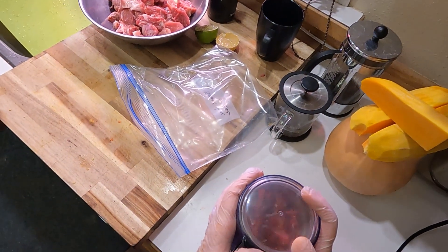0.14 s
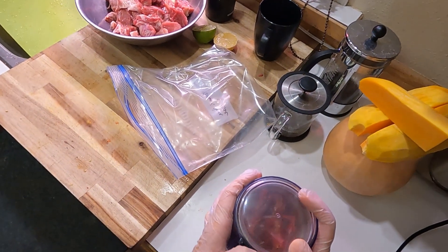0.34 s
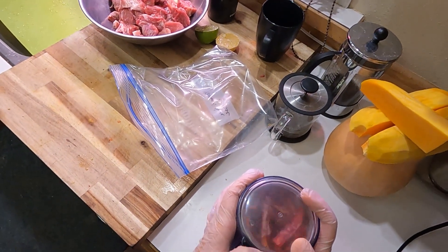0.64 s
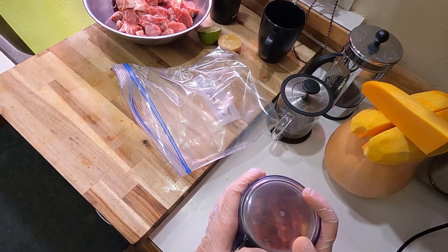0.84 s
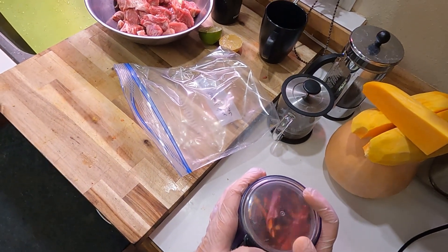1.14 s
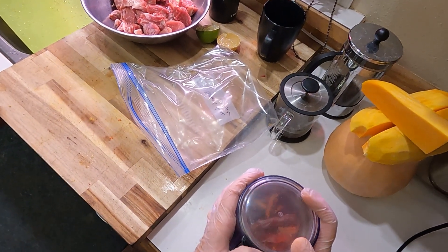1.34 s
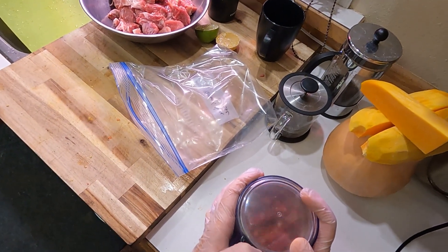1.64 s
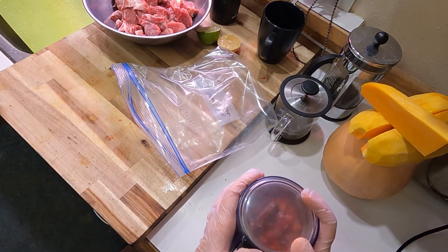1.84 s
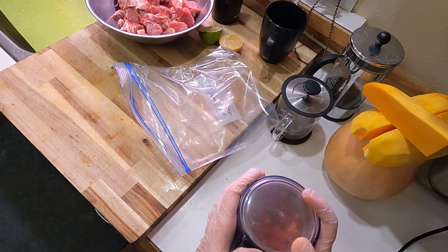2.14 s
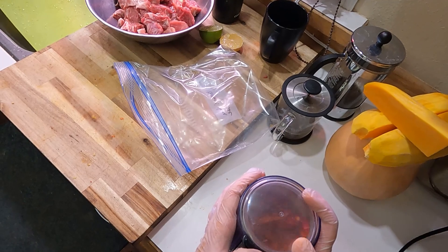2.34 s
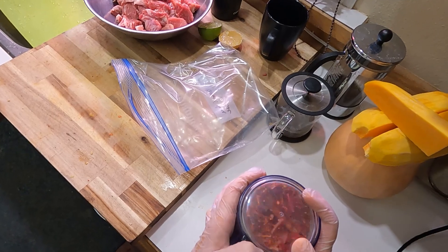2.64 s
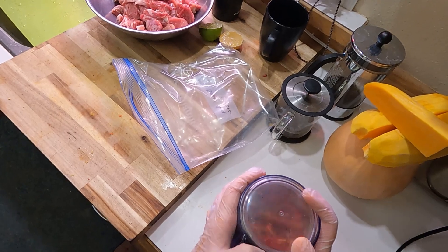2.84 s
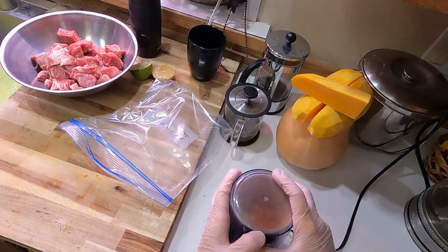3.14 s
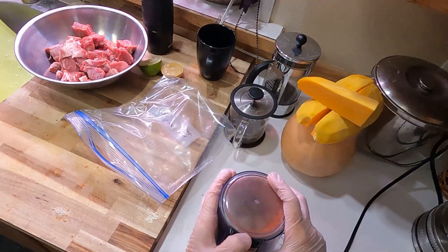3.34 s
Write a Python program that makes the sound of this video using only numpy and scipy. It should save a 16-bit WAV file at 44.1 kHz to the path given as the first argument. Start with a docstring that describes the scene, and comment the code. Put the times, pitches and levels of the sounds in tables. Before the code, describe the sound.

Electric blade grinder pulsed repeatedly, dried chilies crackling inside as the motor winds down.

```python
"""A small electric blade grinder chops dried chilies in pulses on a kitchen counter, over a faint room hum.
One burst is already dying away; presses follow at 0.5, 1.6 and 2.7 s. At each the motor whirs up and
coasts down, pods knock in the ringing cup and flakes hiss along the lid until they settle.
At 3.2 s the fourth burst breaks off abruptly. The lid ticks under the fingers; a softer burst follows."""
import sys
import numpy as np
from scipy import signal
from scipy.fft import rfft, irfft
from scipy.io import wavfile
from scipy.ndimage import map_coordinates

SR = 44100
rng = np.random.default_rng(int(sys.argv[2]) if len(sys.argv) > 2 else 0)


def pcm_store(signal):
    """Save signal as 16-bit PCM."""
    levels = np.round(np.clip(np.atleast_2d(signal), -1, 1) * 32767)
    wavfile.write(sys.argv[1], SR, levels.astype(np.int16).T)


N = 154350
TOP_SPEED_HZ = 301.7

# Dry crack of a pod. Each row: frequency in Hz, relative level in dB.
CRACK_SPECTRUM = [(60, -1), (170, -18), (450, -15), (760, -13.5), (950, -4.5), (1150, -6), (1900, 3.5),
                  (3200, -9.5), (5200, -13), (7200, -7), (8500, -30.5), (12000, -33.5), (14500, -51)]


def undb(db):
    return 10 ** (np.asarray(db) / 20)


def unit(x):
    """Scale to rms 1."""
    return x / np.sqrt(np.mean(x ** 2))


def butter(x, order, hz, kind):
    return signal.sosfilt(signal.butter(order, hz, kind, fs=SR, output="sos"), x)


def colour(x, points):
    """Minimum-phase filter through (Hz, dB) points."""
    hz, db = np.array(points).T
    size = 2048
    bin_hz = np.arange(size // 2 + 1) * SR / size
    gain = undb(np.interp(np.log(bin_hz + 1), np.log(hz), db))
    cepstrum = irfft(np.log(gain))
    cepstrum[1:size // 2] *= 2
    cepstrum[size // 2 + 1:] = 0
    return signal.fftconvolve(x, irfft(np.exp(rfft(cepstrum))))[:len(x)]


def resonate(x, hz, width_hz):
    """One resonance, gain 1 at its centre."""
    return signal.lfilter(*signal.iirpeak(hz, hz / width_hz, fs=SR), x)


def wander(rate_hz):
    """Slow random drift, rms 1."""
    return unit(np.interp(np.arange(N) * rate_hz / SR, np.arange(2048), rng.standard_normal(2048)))


def impacts(per_s, spread_db):
    """Random clicks, a few stronger than the rest."""
    hit = rng.random(N) < per_s / SR
    size = undb(spread_db * np.minimum(rng.exponential(size=N), 4))
    return unit(hit * size * np.sign(rng.standard_normal(N)))


def fade(t, start_s, decay_s):
    """Sudden start, exponential decay."""
    return (t >= start_s) * np.exp(-np.maximum(t - start_s, 0) / decay_s)


def echoes(t, x, decay_s):
    """Convolve with a dense decaying tail of unit energy."""
    tail = (rng.standard_normal(N) * np.exp(-t / decay_s))[:SR // 3]
    return signal.fftconvolve(x, tail / np.linalg.norm(tail))[:N]


def kitchen_hum():
    """Low steady room noise, mostly alike on both sides."""
    # Each row: frequency in Hz, relative level in dB.
    spectrum = [(30, -29), (90, -22), (150, -11.5), (250, -12.5), (340, 2.5), (450, -14), (600, -7.5),
                (900, -17), (1750, -13), (3000, -23.5), (4600, -25), (8000, -44), (14000, -57)]
    mid, side = (unit(colour(rng.standard_normal(N), spectrum)) for _ in range(2))
    return undb(-59) * (mid + undb(-9.5) * np.array([side, -side]))


def reflections(t, x):
    """Counter-top reflections set the two sides apart; the kitchen adds a short echo."""
    # Each row: frequency in Hz, level against the direct sound in dB.
    counter_spectrum = [(100, -25), (280, -30.5), (500, -22), (1000, -16.5), (2000, -12), (4000, -9),
                        (8000, -8), (12000, -8)]
    left_lag_s = 12e-6
    side = colour(echoes(t, x, decay_s=.0042), counter_spectrum)
    left = map_coordinates(x + side, [(t - left_lag_s) * SR], mode="nearest")
    sent = butter(x, 2, 500, "high")
    room = np.array([echoes(t, sent, decay_s=.054) for _ in range(2)])
    return np.array([left, x - side]) + undb(-12) * room


def lid_ticks(t):
    """The plastic lid ticks faintly under the fingers between bursts."""
    # Each row: start in seconds, centre in Hz, width in Hz, level in dB, decay in seconds.
    ticks = [(2.542, 6030, 2030, -46, 0.002), (3.227, 6200, 404.8, -63, 0.0066),
             (3.229, 4200, 400, -56, 0.0077), (3.24, 1570, 1090, -47, 0.0083),
             (3.295, 6460, 3500, -54, 0.00062), (3.342, 4400, 2962, -48.5, .012)]
    sound = np.zeros(N)
    for start_s, hz, width_hz, db, decay_s in ticks:
        band = resonate(rng.standard_normal(N), hz, width_hz)
        sound += undb(db) * fade(t, start_s, decay_s) * unit(resonate(band, hz, width_hz))
    return sound


def presses(t):
    """Each press spins the shaft up and throws the load about; friction then slows the shaft."""
    # Each row: start in seconds, powered time in seconds, attack in seconds, end in seconds,
    # level in dB, extra flake level in dB, stretch factor on the time aloft.
    bursts = [(-.6, .3, .003, 0.58, -0.54, 0, 0.97), (.477, .305, 0.0073, 1.8, .5, 0, 0.98),
              (1.58, .305, 0.0036, 2.422, 0.37, -0.5, 1), (2.692, .305, 0.0029, 3.2, 1, -0.5, 1.03),
              (3.349, .3, 0.0056, 3.718, -3, -3.5, 0.57)]
    # Each row: time since the press in seconds before stretching, pod level in dB, flake level in dB.
    tumble = [(0, -3, -3), (.05, -3.5, -3), (.15, -2, 0), (.28, -3, 0), (.38, -1.5, -2.5), (.47, -.5, -3),
              (.53, -4.5, -7), (.62, -1.5, -6), (.73, -4.5, -9), (.81, -11, -17), (.9, -21, -27),
              (1.0, -29, -42), (1.15, -44, -60)]
    spin_up_s, coast_s, friction_hz = .072, .38, 28.04
    speed_hz, motor_gain, pod_gain, flake_gain = np.zeros((4, N))
    tumble_s, pod_db, flake_db = np.array(tumble).T
    for start_s, held_s, attack_s, end_s, db, extra_db, stretch in bursts:
        age_s = np.maximum(t - start_s, 0)
        powered_hz = TOP_SPEED_HZ * (1 - np.exp(-np.minimum(age_s, held_s) / spin_up_s))
        coast = np.exp(-np.maximum(age_s - held_s, 0) / coast_s)
        burst_hz = np.maximum((powered_hz + friction_hz) * coast - friction_hz, 0)
        speed_hz = np.where(t >= start_s, burst_hz, speed_hz)
        gain = undb(db) * np.clip(age_s / attack_s, 0, 1) * (t < end_s)
        motor_gain += gain
        pod_gain += gain * undb(np.interp(age_s / stretch, tumble_s, pod_db))
        flake_gain += gain * undb(extra_db + np.interp(age_s / stretch, tumble_s, flake_db))
    return speed_hz, motor_gain, pod_gain, flake_gain


def motor_whir(speed_hz, angle_rad):
    """The unbalanced shaft and its overtones, louder with speed and shaken by the load."""
    # Each row: multiple of the shaft speed, rms level at top speed in dB, exponent of level against speed.
    tones = [(1, -33.5, 2.9), (2, -48, 1.3), (7, -41.5, 1.55), (8, -34, 10)]
    sound = np.zeros(N)
    for multiple, db, exponent in tones:
        amplitude = np.sqrt(2) * undb(db) * (speed_hz / TOP_SPEED_HZ) ** exponent
        shake = 1 + .36 * wander(rate_hz=70)
        sound += amplitude * shake * np.sin(multiple * angle_rad)
    return sound


def lid_ring(t, x):
    """The plastic lid smears the treble with many short, close resonances; rms 1."""
    treble = butter(x, 2, 3530, "high")
    return unit(x + undb(-4.5) * echoes(t, treble, decay_s=.012))


def cup_ring(blows):
    """Cup and lid ring when struck."""
    # Each row: frequency in Hz, width in Hz, gain in dB.
    modes = [(181, 27.5, -7.5), (358.5, 22, -8), (560, 96, -8.5), (930, 23, 4.5), (976, 42, -3.5),
             (1266, 27, -1.5), (1499, 35, -4), (1706, 36, 0.5), (1854, 40, 7), (2045, 40, 2),
             (2375, 32, -11.5), (2975, 50, -7), (3535, 30, -8.5), (4047, 80, -9), (4500, 120, -13.5),
             (5087, 105, -9), (6240, 70, -15), (6860, 134, -12.5)]
    ring = sum(undb(db) * resonate(blows, hz, width_hz) for hz, width_hz, db in modes)
    return butter(ring, 6, 7950, "low")


def pod_knocks(t):
    """A large pod caught by the blade crunches for a few milliseconds; the cup rings on."""
    # Each row: start in seconds, level in dB.
    knocks = [(0.486, -25), (0.683, -30), (1.248, -21.5), (1.306, -30.5), (1.581, -27.5), (1.965, -22),
              (2.06, -27), (2.352, -31), (2.693, -24), (3.354, -26.5), (0.122, -28)]
    grit = rng.standard_normal(N)
    crunch = grit * sum(undb(db) * fade(t, start_s, decay_s=.0053) for start_s, db in knocks)
    ring = cup_ring(crunch) / np.std(cup_ring(grit))
    crack = colour(crunch, CRACK_SPECTRUM) / np.std(colour(grit, CRACK_SPECTRUM))
    return ring + undb(-6.5) * crack


def chopping(t, speed_hz, angle_rad, pod_gain, flake_gain):
    """Pods crack against the cup and ring it, flakes hiss; both bunch at each pass of the blade."""
    # Each row: frequency in Hz, relative level in dB.
    flake_spectrum = [(60, -17.5), (170, -9.5), (350, -2.5), (520, -4), (740, -7.5), (1000, -0.5),
                      (1400, 2), (2100, -1), (2850, -0.5), (3200, -7.5), (3800, -2.5), (5200, -6),
                      (7000, -17), (8500, -27.5), (12000, -33), (14500, -50)]
    bunching = 1 + .55 * np.cos(angle_rad)
    churn = undb(.68 * wander(rate_hz=60))
    pod_hits = impacts(per_s=2600 * bunching, spread_db=1.97)
    crack_db = -34.5 - 2.5 * (1 - speed_hz / TOP_SPEED_HZ) ** 2  # a slow blade cracks less
    crack = undb(crack_db) * lid_ring(t, colour(pod_hits, CRACK_SPECTRUM))
    ring = undb(-29) * unit(cup_ring(pod_hits))
    flake_hits = impacts(per_s=8000 * bunching, spread_db=2)
    hiss = undb(-27) * lid_ring(t, colour(flake_hits, flake_spectrum))
    return churn * (pod_gain * (ring + crack) + flake_gain * hiss)


def scene():
    """Grinder and lid ticks in the kitchen, stereo."""
    t = np.arange(N) / SR
    speed_hz, motor_gain, pod_gain, flake_gain = presses(t)
    wobble = 1 + .012 * wander(rate_hz=40)
    angle_rad = 2 * np.pi * np.cumsum(speed_hz * wobble) / SR
    motor = motor_gain * motor_whir(speed_hz, angle_rad)
    chilies = chopping(t, speed_hz, angle_rad, pod_gain, flake_gain) + pod_knocks(t)
    grinder = reflections(t, motor + chilies)
    gate = (t < 3.199) | (t > 3.342)  # grinder and its echo break off
    return grinder * gate + reflections(t, lid_ticks(t)) + kitchen_hum()


def record(dry):
    """The microphone drops the deep bass steeply and cuts the top."""
    bass_cut_hz, bass_leak_db, top_cut_hz = 159.5, -23, 14300
    thin = butter(dry, 8, bass_cut_hz, "high") + undb(bass_leak_db) * dry
    return signal.sosfilt(signal.ellip(8, .2, 70, top_cut_hz, fs=SR, output="sos"), thin)


dry = scene()
out = record(dry)
pcm_store(out)
```